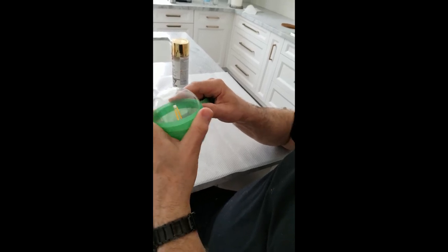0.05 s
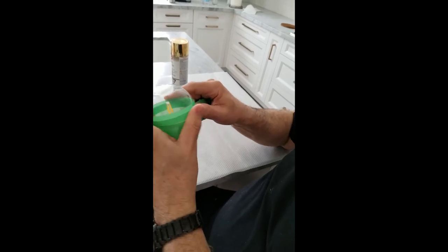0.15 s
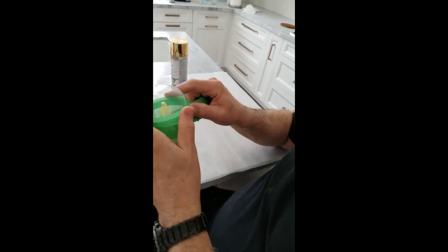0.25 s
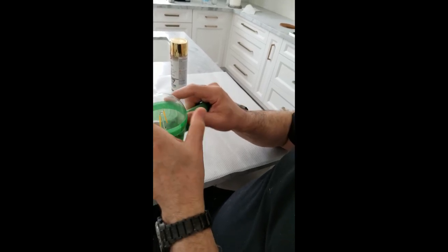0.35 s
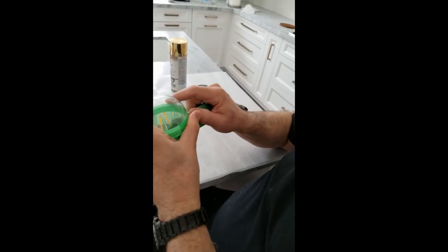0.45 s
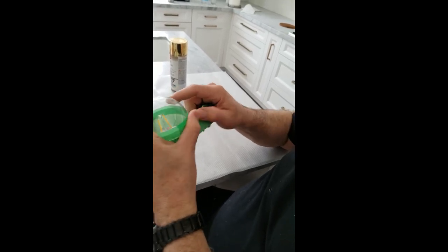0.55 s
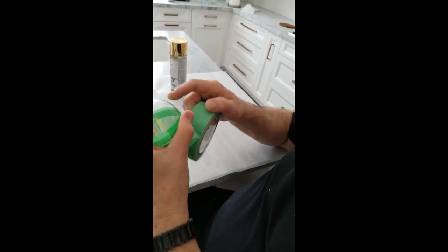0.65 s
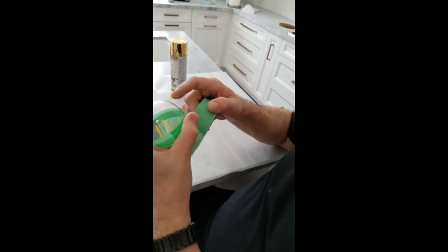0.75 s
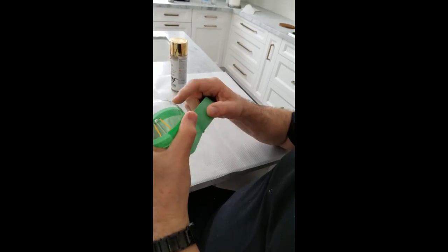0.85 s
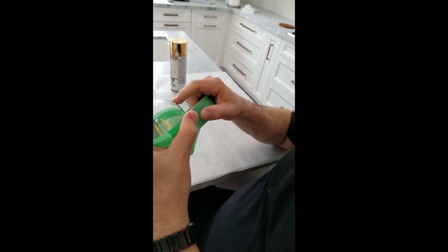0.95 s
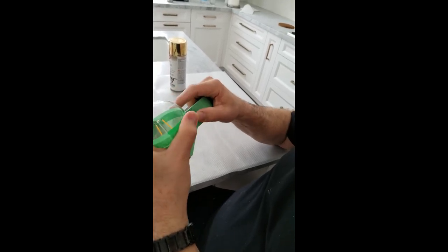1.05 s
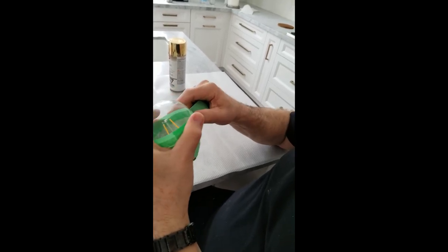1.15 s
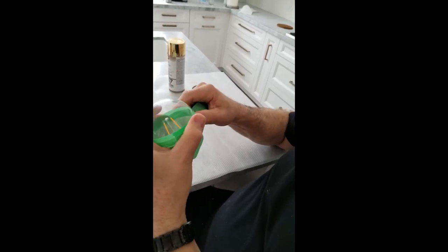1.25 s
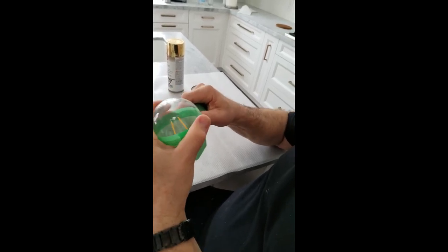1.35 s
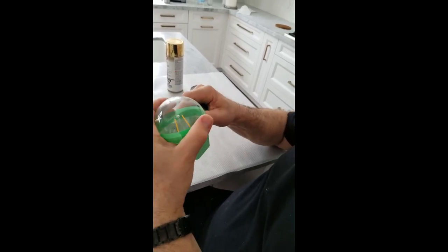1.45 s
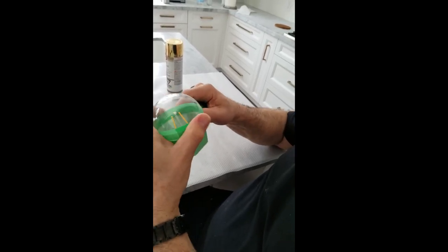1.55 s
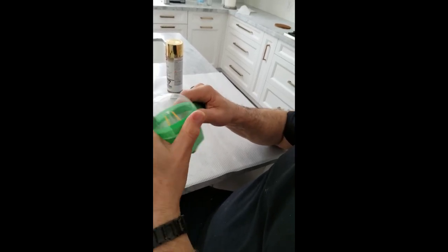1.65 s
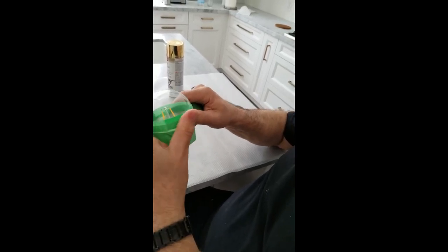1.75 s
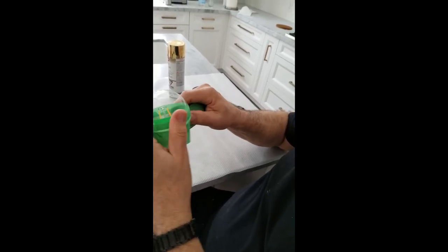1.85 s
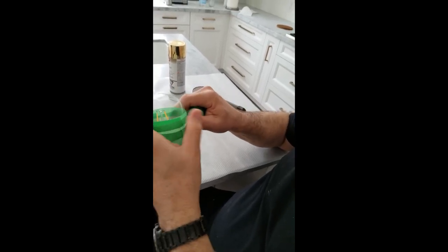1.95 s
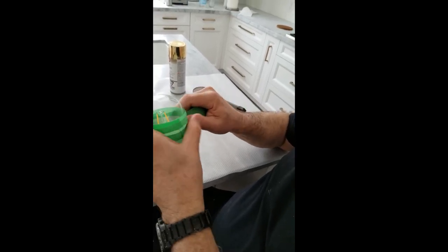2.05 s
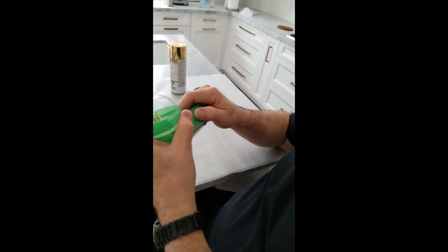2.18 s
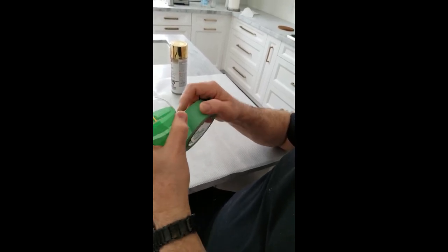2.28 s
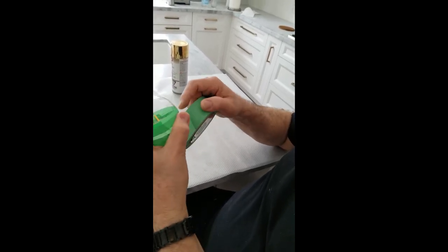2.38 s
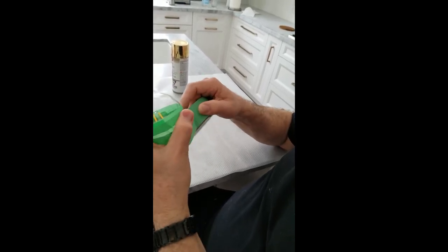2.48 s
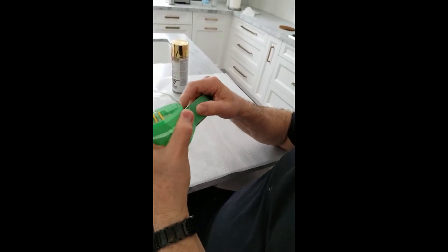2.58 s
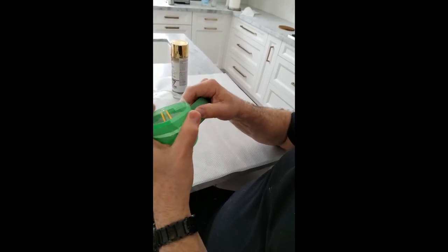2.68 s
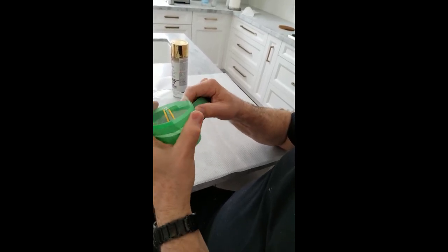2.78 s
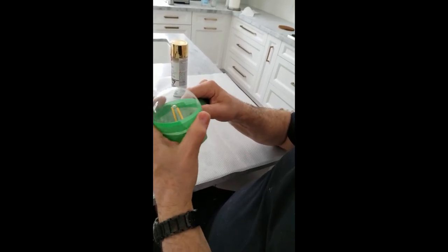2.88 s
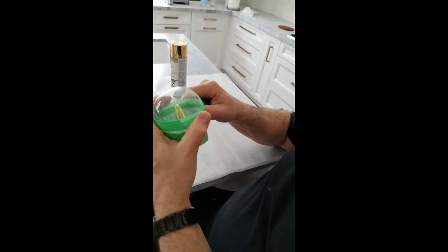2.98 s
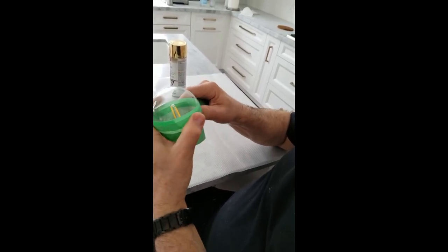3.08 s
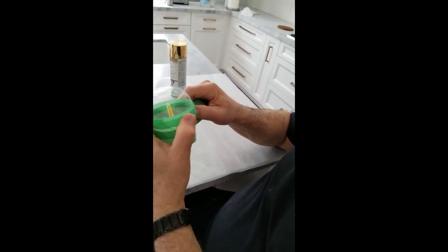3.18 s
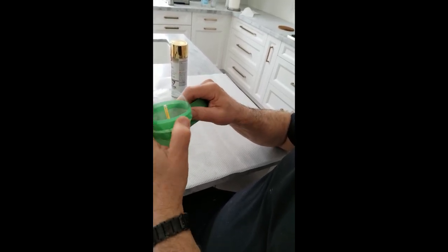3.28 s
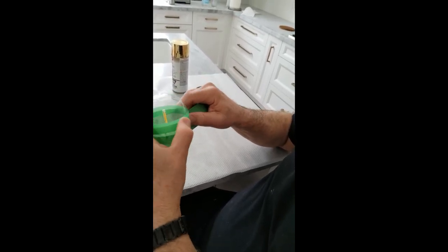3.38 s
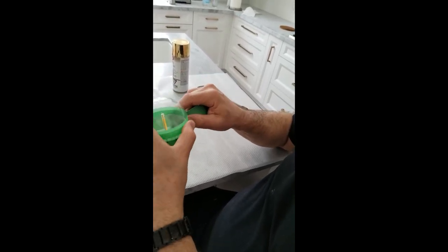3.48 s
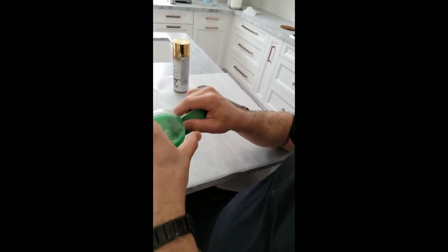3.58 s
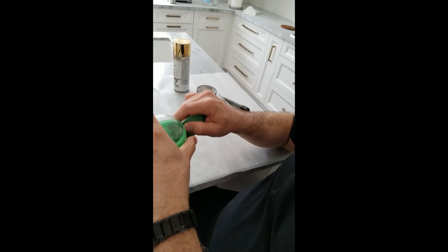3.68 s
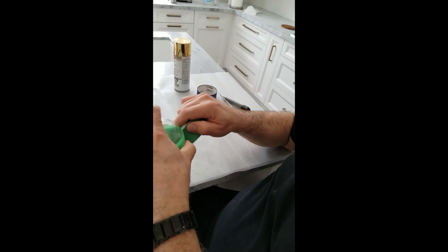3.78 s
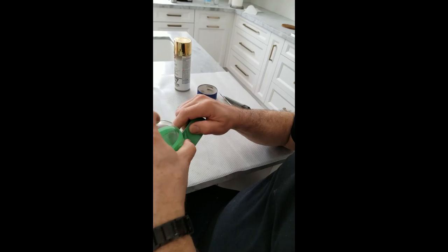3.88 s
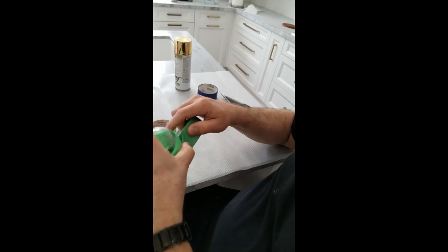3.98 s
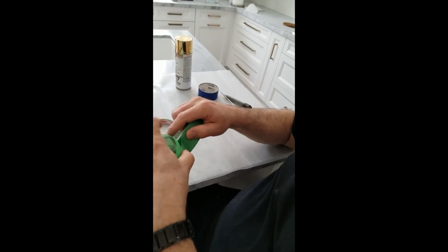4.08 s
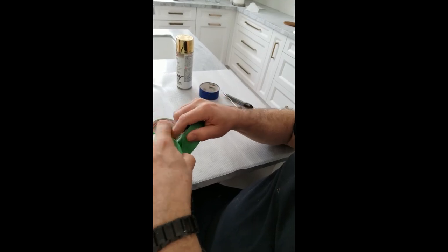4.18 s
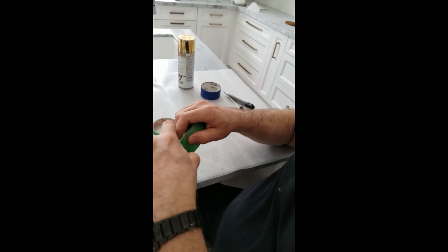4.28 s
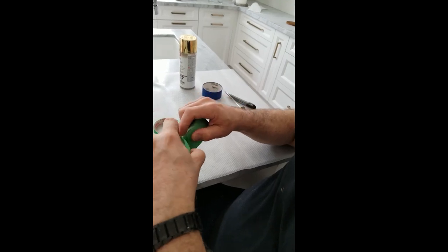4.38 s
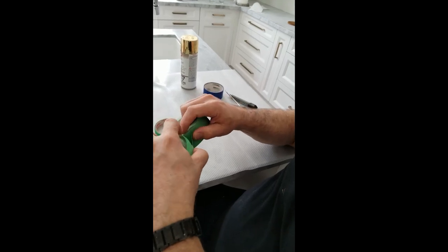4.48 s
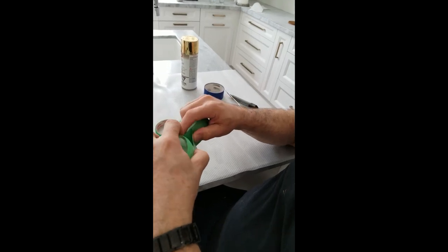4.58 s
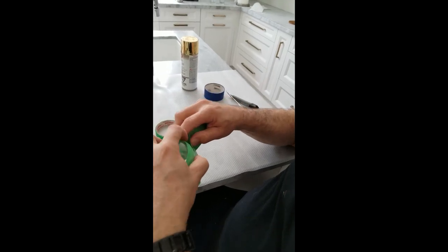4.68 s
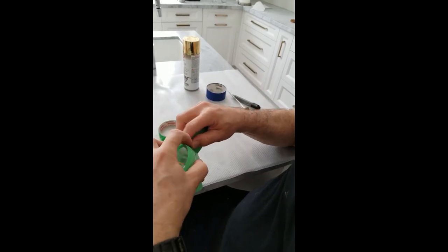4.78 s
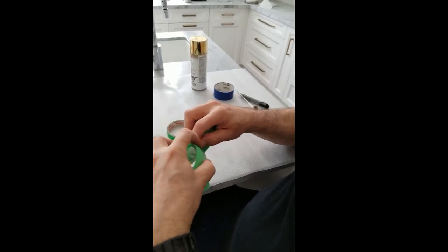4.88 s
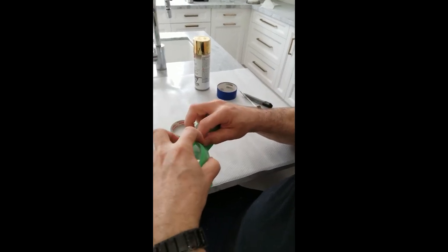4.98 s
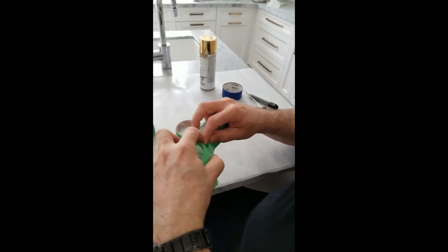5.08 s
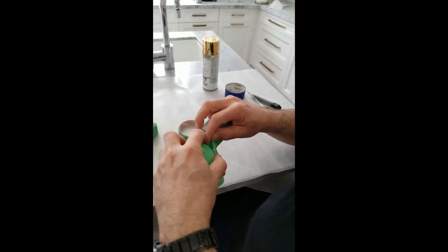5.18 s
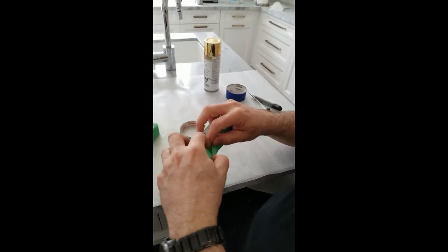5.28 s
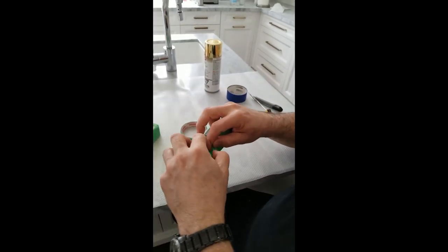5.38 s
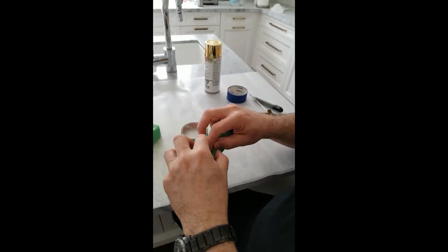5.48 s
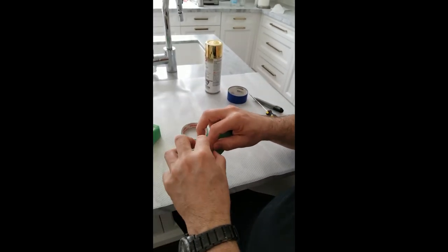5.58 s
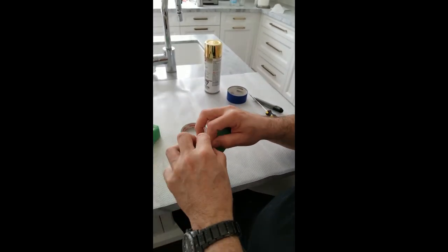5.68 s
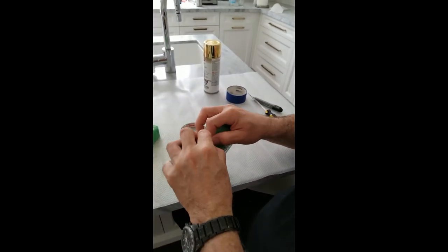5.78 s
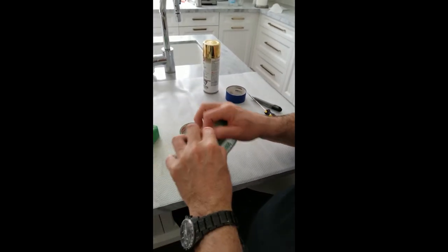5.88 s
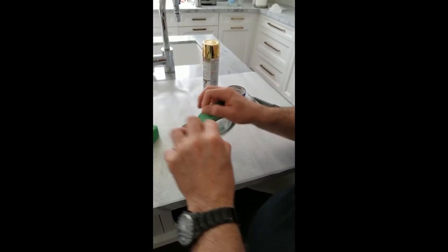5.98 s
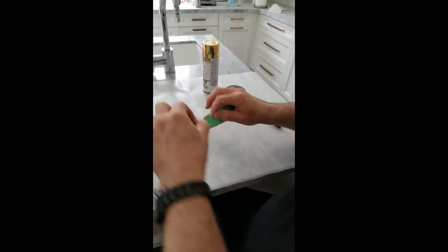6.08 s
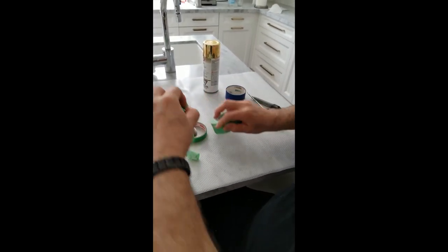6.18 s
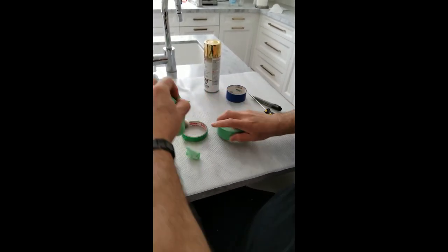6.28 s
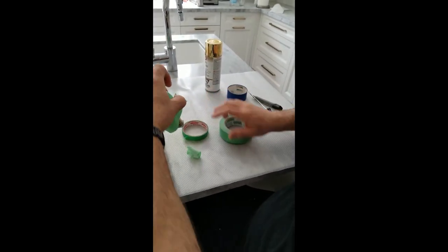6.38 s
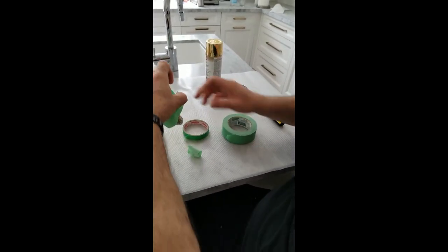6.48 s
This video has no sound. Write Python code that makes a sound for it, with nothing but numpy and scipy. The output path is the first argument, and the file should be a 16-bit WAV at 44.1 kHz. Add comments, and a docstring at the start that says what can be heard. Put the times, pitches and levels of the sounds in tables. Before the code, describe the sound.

A close stereo pickup in a small hard kitchen, with faint low appliance hum and air throughout. From 0 to 0.6 s, fingers rub tape lightly with crisp paper snaps, the sharpest at 0.44 with a dull tap. From 0.66 to 1.15 s the tape peels loudly off its roll, a dense bright crackle with jerky surges and slight squeaks. Sparse ticks and soft strokes follow; a snappy burst comes near 2.1, then a short hard pull at 2.3-2.5. A low soft thump falls at 2.9. Light rubs, ticks and faint squeaks run from 3 to 4.1; another pull builds from 4.16 to 4.66. Quiet smoothing with small snaps lasts until 5.8. A very brief, sharp rip bursts at 5.84-5.9. At 6.2 the roll knocks dully on the counter, followed by crackly scuffs and low sleeve rustle to the end.

```python
"""Masking tape round a glass bulb

Masking tape is unwound from its roll and wrapped round a glass bulb in a small, hard kitchen.
Stick-slip of the glue is a dense train of tiny scattered clicks that excites the strip's resonances.
The paper backing buckles in short noise bursts, skin squeaks as gliding bands of noise, and the strip
rips in near-regular bursts. The roll is put down as decaying modes; an appliance hums as sines of
wandering phase."""
import sys
import numpy as np
from scipy import signal
from scipy.fft import rfft, irfft, next_fast_len
from scipy.io import wavfile
from scipy.ndimage import uniform_filter1d

SR = 44100
rng = np.random.default_rng(int(sys.argv[2]) if len(sys.argv) > 2 else 0)


def waveform_to_disk(signal):
    """Save audio, clipped to [-1, 1], as 16-bit WAV at the path in sys.argv[1]."""
    frames = np.transpose(np.atleast_2d(signal))
    scaled = np.clip(frames, -1, 1) * 32767
    samples = np.round(scaled).astype(np.int16)
    wavfile.write(sys.argv[1], SR, samples)


N = 288414
TIME = np.arange(N) / SR

# relative spectrum of the fizz, shared by glue and snaps: (frequency [Hz], density [dB per Hz])
FIZZ = [(5000, -8.5), (8000, 5.5), (11000, 5), (14000, 6), (16500, -8)]


def from_db(db):
    """Logarithmic level: decibels to amplitude gain."""
    return 10 ** (np.asarray(db) / 20)


def rms_one(x):
    """Normalisation: scale to unit mean power."""
    return x / np.sqrt(np.mean(x ** 2) + 1e-20)


def at_hz(points, hz):
    """Interpolation of a table along a logarithmic frequency axis."""
    f, value = np.transpose(points)
    return np.interp(np.log(hz + 1e-9), np.log(f), value)


def coloured(x, spectrum):
    """Spectral shaping: weight a sound by a spectrum with falling skirts beyond its ends; rms 1."""
    size = next_fast_len(x.shape[-1])
    hz = np.arange(size // 2 + 1) * SR / size + 1e-3
    lower_skirt = np.minimum(1, hz / spectrum[0][0]) ** 2
    upper_skirt = np.minimum(1, spectrum[-1][0] / hz) ** 2
    shaped = rfft(x, size) * from_db(at_hz(spectrum, hz)) * lower_skirt * upper_skirt
    return rms_one(irfft(shaped, size)[..., :x.shape[-1]])


def drift(rate):
    """Low-passed chance: noise through a double pole at rate [Hz], with spread 1."""
    step = 40  # samples between drawn values
    r = np.exp(-2 * np.pi * rate * step / SR)
    noise = rng.standard_normal(N // step + 2002)
    slow = signal.lfilter([1], [1, -2 * r, r * r], noise)[2000:]  # drop the filter's settling
    return np.interp(np.arange(N) / step, np.arange(len(slow)), rms_one(slow))


def ring(x, hz, t60):
    """Damped resonator: a unit click sets a decaying sine of initial height 1 ringing."""
    r = np.exp(-np.log(1000) / (t60 * SR))
    w = 2 * np.pi * min(hz, SR / 2) / SR
    return signal.lfilter([0, np.sin(w)], [1, -2 * r * np.cos(w), r * r], x + 1e-18)


def dying(t, t60):
    """Exponential decay: a fall of 60 dB in t60 [s]."""
    return np.exp(-np.log(1000) * t / t60)


def diffuse(size):
    """Diffuse field: white noise whose left-right correlation depends on frequency."""
    # likeness of the two channels: (frequency [Hz], correlation [-1 to 1])
    correlation = [(30, 1), (70, 0.065), (130, 0.97), (260, 0.66), (600, 0.33), (1500, -0.39), (5000, 0.26),
                   (16000, -0.52)]
    mid, side = rfft(rng.standard_normal((2, size)))
    alike = np.clip(at_hz(correlation, np.arange(len(mid)) * SR / size), -1, 1)
    spectra = np.sqrt(1 + alike) * mid + np.sqrt(1 - alike) * side * [[1], [-1]]
    return irfft(spectra, size)


def panned(x, left_db):
    """Level difference: raise left over right by left_db [dB]."""
    return x * from_db([[left_db / 2], [-left_db / 2]])


def hump(middle_s, length_s):
    """Gaussian contact: smooth rise and fall, length_s wide where it is down to 1/e."""
    return np.exp(-(2 * (TIME - middle_s) / length_s) ** 2)


def held(start_s, end_s, attack_s, release_s):
    """Sustained contact: one from start to end, with Gaussian flanks before and after."""
    early = np.maximum(start_s - TIME, 0) / attack_s
    late = np.maximum(TIME - end_s, 0) / release_s
    return np.exp(-early ** 2 - late ** 2)


def slips(per_s, spread_db, scatter_t60, direct):
    """Scattering: random clicks of uneven size reach each microphone by way of hands and bulb."""
    sizes = from_db(spread_db * np.minimum(rng.exponential(1, N), 4)) * rng.choice([-1, 1], N)
    clicks = sizes * (rng.random(N) < per_s / SR) / np.sqrt(per_s)
    # each click takes one of six stereo paths, 400 samples long
    dealt = rng.integers(0, 6, N)
    paths = rng.standard_normal((6, 2, 400)) * dying(TIME[:400], scatter_t60)
    paths[:, :, 0] += direct
    return sum(signal.fftconvolve([clicks * (dealt == k)], path, axes=1)[:, :N]
               for k, path in enumerate(paths))


def peeling(wander_db, clump_db):
    """Stick-slip: glue threads break faster the harder the pull, and in clumps."""
    # relative spectra of crackle and rasp: (frequency [Hz], density [dB per Hz])
    crackle_colour = [(1200, -16), (2200, -7.5), (3000, 2), (7500, -1.5), (10500, 9)]
    rasp_colour = [(150, -23), (350, -1.5), (650, 3), (950, -1), (1400, 4), (2100, -2), (3200, -16)]
    # broad resonances of the stretched strip: (frequency [Hz], width [Hz], mean level [dB])
    strip_modes = [(2540, 880, -8.5), (3430, 740, 0.5), (4190, 1760, -0.5), (5390, 435, 0.5),
                   (5600, 2300, -2.5), (7550, 7200, -15.5)]
    # brief surges of friction: the strip jerks free, and at 6.29 s a scuff:
    # (time [s], surge of crackle and rasp [dB])
    surges = [(0.79, 11), (0.84, 6.5), (0.862, 9), (0.939, 10), (0.996, 3.5), (2.111, 14), (2.361, 5.5),
              (2.421, 6), (4.526, 10), (6.292, 10)]
    surge_half_s = 0.005  # half-width of a surge, at 1/e

    crackle_db, rasp_db, fizz_db = handwork()
    slips_per_s = 3500 * from_db(.7 * (crackle_db + 47.0)) + 1500
    grains = slips(slips_per_s, spread_db=2.0, scatter_t60=0.011, direct=3.4)
    # even out the running power
    power = uniform_filter1d(np.mean(grains ** 2, axis=0), size=1500)
    grains = grains / np.sqrt(power + 1e-9)
    # single ridges of the crepe paper tick under tension; a light touch mostly hisses
    ridges = rms_one(slips(slips_per_s / 20, spread_db=2.0, scatter_t60=.007, direct=4.0))
    tension = np.clip((crackle_db + 68) / 22, .1, 1)
    grains = (grains + .6 * tension * ridges) * from_db(tension * clump_db * drift(70))
    # stray wrinkles of the backing tick at random, 35 a second
    wrinkles = rms_one(slips(35, spread_db=-0.5, scatter_t60=0.017, direct=1.0))
    grains = grains + from_db(-8.5) * wrinkles
    # the free length changes, so its resonances come and go
    strip = 0
    for k, (hz, width, db) in enumerate(strip_modes):
        resonance = rms_one(signal.lfilter(*signal.iirpeak(hz, hz / width, fs=SR), grains))
        strip = strip + (-1) ** k * from_db(db + wander_db * drift(26.0)) * resonance
    surge_db = sum(db * np.exp(-((TIME - s) / surge_half_s) ** 2) for s, db in surges)
    crackle = from_db(crackle_db + surge_db - 0.75) * coloured(strip, crackle_colour)
    rasp = from_db(rasp_db + surge_db - 1.0) * coloured(grains, rasp_colour)
    fizz = from_db(fizz_db + 0.4 * surge_db - 3.1) * coloured(grains, FIZZ)
    return panned(crackle + rasp, 0.8) + panned(fizz, 2.6)


def handwork():
    """Power summation: pulls, strokes and resting grip give crackle, rasp and fizz levels [dB]."""
    # tape is pulled off the roll; levels before the final trims of the peeling:
    # (start [s], hardest pull [s], end [s], crackle at hardest [dB], rasp re crackle [dB],
    #  fizz re crackle [dB], build-up [dB], slackening [dB])
    pulls = [(0.66, 0.889, 1.14, -38.5, -8, -0.5, 7.5, 17.5), (2.312, 2.441, 2.495, -41.5, -5, 0.5, 5, 1.5),
             (4.161, 4.554, 4.66, -45, -4.5, -2, 8.5, 5.5)]
    # fingers smooth the tape down; levels before the same trims:
    # (middle [s], length [s], crackle [dB], rasp re crackle [dB], fizz re crackle [dB])
    strokes = [(0.11, 0.15, -56, -10, -12), (0.373, 0.18, -56.5, -1, -14), (0.502, 0.08, -56.5, 5.5, 10),
               (0.635, 0.12, -54.5, -9, 2), (1.076, 0.056, -54.5, 0, 7.5), (1.207, 0.079, -58, 1.5, -3),
               (1.389, 0.13, -59.5, 3, -14), (1.535, 0.053, -57.5, -1, 3), (1.692, 0.13, -53, -3, -5),
               (2.087, 0.043, -48, -7.5, -2), (2.152, 0.13, -53, -3, -5), (2.295, 0.065, -50.5, -4.5, 2),
               (2.655, 0.16, -52.5, -7.5, -2), (2.812, 0.16, -63, -8, -7), (3.142, 0.041, -50.5, -8.5, -3),
               (3.378, 0.22, -65.5, 3, 5.5), (3.61, 0.071, -55, -2.5, -6), (3.698, 0.12, -54, -4.5, -7),
               (3.824, 0.069, -55, 5, 2), (4.054, 0.18, -64, 5, 1), (4.918, 0.41, -66, -26, 4.5),
               (5.163, 0.42, -61, -10, 1), (5.37, 0.14, -59.5, -22, 3.5), (5.55, 0.073, -61, -3, 1),
               (6.114, 0.096, -59.5, -4, 7.5), (6.255, 0.14, -48, -6.5, -20),
               (6.388, 0.07, -43.5, -9.5, -4.5), (6.53, 0.11, -48.5, -7, -13)]
    # the hands never quite rest, before the same trims: (crackle [dB], rasp [dB], fizz [dB])
    resting_grip = (-73, -73, -76)
    grip_s, let_go_s = 0.0067, 0.057
    rasp_growth, fizz_growth = 1.17, 1.19  # dB per dB of effort

    power = from_db(resting_grip)[:, None] ** 2 * np.ones(N)
    for start, hardest, end, db, rasp_db, fizz_db, build_db, slacken_db in pulls:
        effort_db = np.interp(TIME, [start, hardest, end], [-build_db, 0, -slacken_db])
        parts_db = [effort_db, rasp_db + rasp_growth * effort_db, fizz_db + fizz_growth * effort_db]
        power += (from_db(db) * from_db(parts_db) * held(start, end, grip_s, let_go_s)) ** 2
    for middle, length, db, rasp_db, fizz_db in strokes:
        parts = from_db([[0], [rasp_db], [fizz_db]])
        power += (from_db(db) * parts * hump(middle, length)) ** 2
    return 10 * np.log10(power)


def snaps(rise_s, crack_db, ring_db, body_db, top_db, halo_db, spike_db, size=1500, lead=300):
    """Buckling: the backing spikes and cracks amid a faint halo of noise, swelling before and dying after."""
    # snaps of the paper backing; levels before the common offsets given as arguments:
    # (time [s], level [dB], ring frequency [Hz], body [dB], top [dB], t60 [s], 3 ms at least)
    snap_events = [(0.1486, -28.5, 4060, -17, -22, 0.0087), (0.2019, -42, 3360, -31, -12, 0.011),
                   (0.2656, -20, 4480, -59, -24, 0.025), (0.3039, -29.5, 3350, -12, -22, 0.0073),
                   (0.4, -30.5, 4230, -27, -19.5, 0.02), (0.4396, -11, 4000, -42, -20.5, 0.016),
                   (0.552, -29, 4330, -15.5, -43, 0.0082), (0.9407, -23, 5200, -13.5, -17.5, 0.0053),
                   (1.0698, -31, 5260, -35, -19, 0.02), (1.164, -40.5, 6450, -21, -11, 0.02),
                   (1.175, -36.5, 4540, -13.5, -13, 0.016), (1.3225, -48.5, 4020, -17, -14, 0.0089),
                   (1.3933, -42.5, 1430, 0, -39, 0.012), (1.6399, -29.5, 4240, -52, -25.5, 0.04),
                   (1.687, -32, 4520, -41, -15.5, 0.022), (1.8501, -47, 6600, -12, -3, 0.005),
                   (1.8813, -50.5, 12600, -10, -4.5, 0.013), (2.016, -44.5, 5000, -13, -16, 0.01),
                   (2.0572, -24.5, 3600, -49, -28, 0.013), (2.0718, -32.5, 5640, -33, -15, 0.018),
                   (2.1005, -17.5, 4830, -14.5, -20.5, 0.02), (2.1869, -29.5, 2900, -24, -26, 0.018),
                   (2.218, -35.5, 4930, -15, -14, 0.014), (2.458, -17, 4400, -46, -25, 0.0025),
                   (2.6389, -29, 4760, -31, -29, 0.012), (2.9078, -34, 4940, -43, -29, 0.0052),
                   (3.097, -52.5, 6950, -23, -11, 0.012), (3.2831, -23.5, 4160, -40, -20, 0.011),
                   (3.3136, -37.5, 3800, -10, -20, 0.014), (3.3622, -45, 1260, 2.5, -35, 0.014),
                   (3.706, -23.5, 4190, -14, -20.5, 0.018), (3.7982, -29, 3550, -14.5, -47, 0.057),
                   (3.8276, -23, 4800, -21, -21, 0.013), (3.8467, -37, 3730, -35, -10.5, 0.013),
                   (3.8615, -28.5, 3770, -12, -19.5, 0.023), (3.9249, -32.5, 3000, -14, -42, 0.015),
                   (4.0044, -22.5, 3580, -24, -19, 0.016), (4.148, -32.5, 3840, -5.5, -41, 0.0073),
                   (4.4975, -17, 4040, -26, -20, 0.009), (4.6963, -30, 1700, -8, -29, 0.0078),
                   (5.0436, -28, 6240, -13.5, -13, 0.013), (5.1286, -35.5, 1950, -2, -12.5, 0.02),
                   (5.1524, -27.5, 3540, -11, -26, 0.0055), (5.461, -22, 5000, -19.5, -30, 0.0057),
                   (5.5663, -42, 5000, -4, -10.5, 0.0043), (5.632, -53.5, 12200, -32, 2, 0.0069),
                   (5.709, -36.5, 5500, -16, -23.5, 0.0069), (6.054, -36, 2870, -24, -19, 0.013),
                   (6.0861, -46.5, 6730, -21, -4.5, 0.011), (6.1765, -21.5, 7440, -43, -8.5, 0.0063),
                   (6.2079, -26.5, 5030, -9, -16, 0.024), (6.3542, -16.5, 3960, -29, -19, 0.013),
                   (6.4648, -28.5, 3060, -25, -26, 0.031)]
    # relative spectra of a snap: (frequency [Hz], density [dB per Hz])
    crack_colour = [(800, -67.5), (2000, -78), (3000, -0.5), (4000, 8), (6000, 8), (8000, -2), (12000, -73)]
    body_colour = [(100, -32), (300, 13), (700, 0.5), (1400, 9.5), (2600, 10)]

    out = np.zeros((2, N + size))
    t = np.abs(np.arange(size) - lead) / SR  # time to or from the buckling
    attack = (np.arange(size) >= lead) * (1 - np.exp(-(t / rise_s) ** 8))
    for s, db, hz, low_db, high_db, t60 in snap_events:
        buckle = attack * (dying(t, max(t60, .003)) + from_db(spike_db) * dying(t, .003))
        halo = from_db(halo_db) * dying(t, 0.018)
        # the burst is noise shaped by the buckle and its halo; the ring at the strip's pitch is added below
        burst = diffuse(size) * (buckle / buckle.max() + halo)
        crack = from_db(crack_db) * coloured(burst, crack_colour)
        body = from_db(low_db + body_db) * coloured(burst, body_colour)
        top = from_db(high_db + top_db) * coloured(burst, FIZZ)
        tone = from_db(ring_db) * rms_one(ring(burst, hz, .003))
        snap = crack + body + top + tone
        snap *= snap.std() / snap.std(axis=1, keepdims=True)  # equally strong both ways, before panning
        at = int(s * SR) - lead
        out[:, at:at + size] += from_db(db) * panned(snap, 1.5)
    return out[:, :N]


def rip(jitter, fray_db):
    """Periodic fracture: the tear crosses crepe ridges in near-regular bursts amid snapping fibres."""
    # relative spectrum of the tear: (frequency [Hz], density [dB per Hz])
    rip_colour = [(150, -17), (480, -1), (620, -4), (800, -3.5), (1150, -7), (1650, 1.5), (2000, 0),
                  (2600, 1), (5500, 3), (8000, 0.5), (11000, -0.5), (16000, -3)]
    start_s, end_s, attack_s, release_s = 5.842, 5.893, 0.0018, 0.012
    end_db, swell_db, bursts_per_s = -25.5, 7.5, 770

    # the tear swells until the last fibres part
    level_db = end_db + np.interp(TIME, [start_s, end_s], [-swell_db, 0])
    ridges = np.floor(np.cumsum(bursts_per_s * np.exp(jitter * drift(200))) / SR)
    bursts = np.diff(ridges, prepend=0) * from_db(3 * rng.standard_normal(N))
    fibres = slips(np.full(N, 6000.), spread_db=1.5, scatter_t60=0.009, direct=0.66)
    tear = coloured(bursts, rip_colour) + from_db(fray_db) * coloured(fibres, rip_colour)
    envelope = from_db(level_db) * held(start_s, end_s, attack_s, release_s)
    return panned(envelope * rms_one(tear), 1.6)


def rubs(width_hz, judder_db):
    """Frictional excitation: sticking, slipping skin stirs one resonance that glides with the grip."""
    # fingers squeak faintly along tape and roll; levels before the judder:
    # (middle [s], length [s], level [dB], resonance at middle [Hz], glide [Hz per s])
    squeaks = [(0.047, 0.15, -64, 5100, 0), (0.302, 0.15, -62, 3660, 1), (0.71, 0.09, -46.5, 2710, 3),
               (0.8, 0.12, -46.5, 3530, 2), (0.83, 0.1, -44.5, 1319, -2500),
               (3.167, 0.27, -67.5, 2710, -300), (3.385, 0.062, -54, 816, 1303),
               (3.857, 0.14, -52, 3430, -1200), (4.019, 0.05, -48.5, 3000, -4000),
               (4.262, 0.12, -49.5, 2100, 603), (4.318, 0.14, -52, 3430, 7),
               (6.289, 0.021, -43.5, 2526, -4000)]
    out = np.zeros((2, N))
    lowpass = signal.butter(2, width_hz / 2, fs=SR, output="sos")
    friction = rms_one(signal.sosfilt(lowpass, rng.standard_normal((2, 2, N))))
    judder = from_db(judder_db * drift(100))
    for middle, length, db, hz, glide in squeaks:
        on = np.abs(TIME - middle) < 2 * length
        phase = 2 * np.pi * np.cumsum(hz + glide * (TIME[on] - middle)) / SR
        # two slow noises in quadrature make a band of noise about the resonance
        squeak = friction[0][:, on] * np.cos(phase) + friction[1][:, on] * np.sin(phase)
        out[:, on] += from_db(db) * hump(middle, length)[on] * squeak
    return panned(out * judder, 5.5)


def knocks():
    """Modal excitation: soft contacts set the roll's modes ringing, each a little differently."""
    # dull knocks of the roll in the hand and on the counter:
    # (time [s], level [dB], softness cut-off [Hz])
    contacts = [(0.44, -41.5, 910), (2.101, -39.5, 900), (2.922, -36.5, 140), (3.362, -48, 1800),
                (4.696, -51, 2050), (6.166, -55, 1210), (6.208, -30.5, 900), (6.218, -24, 347),
                (6.234, -33, 300), (6.249, -44, 300), (6.28, -43, 600)]
    # modes of the cardboard roll on the counter: (frequency [Hz], mean level [dB], t60 [s])
    roll_modes = [(134, -16.5, 0.25), (181, -18, 0.84), (230, -11, 0.13), (269.6, -6.5, 0.14),
                  (337, -10, 0.18), (396.3, -9, 0.15), (473, -0.5, 0.072), (562, 1, 0.071),
                  (715, -2, 0.054), (1020, -16, 0.074), (1430, -10, 0.05)]
    out = np.zeros((2, N + SR))
    t = TIME[:SR // 2]
    hz, mode_db, t60 = np.transpose(roll_modes)[:, :, None]
    modes = np.sin(2 * np.pi * hz * t) * dying(t, t60)
    modes[1::2] *= -1  # neighbouring modes swing in opposite directions
    for s, db, soft_hz in contacts:
        uneven_db = rng.normal(0, 1.9, (2,) + hz.shape)
        strength = from_db(db + mode_db + uneven_db) / np.hypot(1, hz / soft_hz)
        at = int(s * SR)
        out[:, at:at + len(t)] += np.sum(strength * modes, axis=1)
    return panned(out[:, :N], 0.3)


def kitchen(x, wet_db, counter_db, counter_s, build_s):
    """Reverberation: a tail dies band by band, with a bounce off the counter just after it starts."""
    # the kitchen's decay: (frequency [Hz], t60 [s])
    room_decay = [(100, 0.75), (500, 0.48), (2000, 0.38), (4000, 0.54), (8000, 0.32), (16000, 0.35)]
    t = TIME[:SR // 2]
    noise, tail = diffuse(len(t)), 0
    edges = np.geomspace(60, 18000, 9)
    for low, high in zip(edges, edges[1:]):
        bandpass = signal.butter(2, [low, high], "band", fs=SR, output="sos")
        band = signal.sosfiltfilt(bandpass, noise)
        tail = tail + band * dying(t, at_hz(room_decay, np.sqrt(low * high)))
    tail = rms_one(tail * (1 - np.exp(-t / build_s)))
    bounce = rms_one(diffuse(len(t)) * (t > counter_s) * dying(np.abs(t - counter_s), 0.005))
    echo = (from_db(wet_db) * tail + from_db(counter_db) * bounce) / np.sqrt(len(t))
    return x + signal.fftconvolve(x, echo, axes=1)[:, :N]


def background():
    """Superposition: hum partials of wandering phase over the low rush of room air and moving arms."""
    # appliance hum: (frequency [Hz], rms level before panning [dB])
    hum_partials = [(68, -70.5), (120, -65), (240, -58.5), (349, -104), (872, -76)]
    # relative spectra of still air and of the sleeves: (frequency [Hz], density [dB per Hz])
    air_colour = [(20, -30), (31, 5), (41, -32), (62, 1), (80, -1.5), (100, -0.5), (140, -5), (200, 4.5),
                  (270, 0.5), (400, -6), (700, -11), (1300, -19), (3000, -29), (16000, -31)]
    sleeve_colour = [(55, -5), (110, -7), (200, 5), (300, -3), (450, -5.5), (900, -13.5)]
    # the arms shift with a low rustle: (time [s], level [dB])
    arm_levels = [(6.1, -63.5), (6.25, -39.5), (6.4, -49.5), (6.54, -43)]
    hum = 0
    for hz, db in hum_partials:
        phase = 2 * np.pi * hz * TIME + 1.01 * drift(5.3)
        hum = hum + from_db(db) * np.sqrt(2) * np.sin(phase)
    air = from_db(-56) * coloured(diffuse(N), air_colour)
    arms_db = np.interp(TIME, *np.transpose(arm_levels))
    arms = from_db(arms_db) * coloured(diffuse(N), sleeve_colour)
    return panned(hum, -0.86) + air + arms


def scene():
    """Superposition: the handiwork sounds in the kitchen, over its background."""
    tape = peeling(wander_db=1.0, clump_db=1.0)
    tape = tape + rubs(width_hz=550, judder_db=3.5)
    tape = tape + rip(jitter=.04, fray_db=5.0)
    tape = tape + snaps(rise_s=.0011, crack_db=-22, ring_db=-22.5, body_db=-10.0, top_db=-2.5,
                        halo_db=-21, spike_db=9.5)
    handiwork = kitchen(tape + knocks(), wet_db=-6.0, counter_db=-14.5, counter_s=0.0093, build_s=0.0016)
    return handiwork + background()


def record(dry):
    """Band limiting: the microphone sheds the deep bass, and the top is cut steeply."""
    bass_cut = signal.butter(3, 40, "high", fs=SR, output="sos")
    top_cut = signal.ellip(10, .1, 70, 16300, fs=SR, output="sos")
    return signal.sosfilt(top_cut, signal.sosfilt(bass_cut, dry))


dry = scene()
out = record(dry)
waveform_to_disk(out)
```